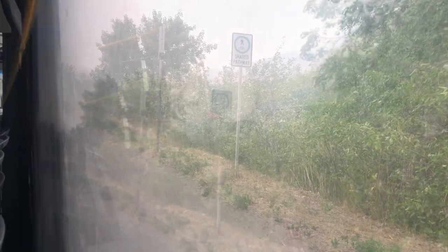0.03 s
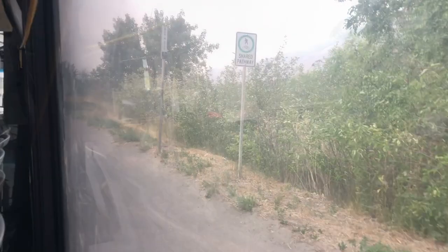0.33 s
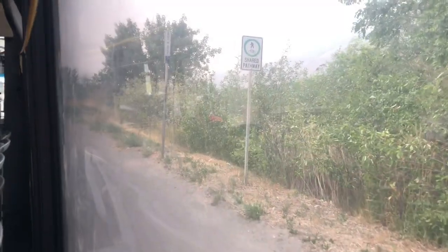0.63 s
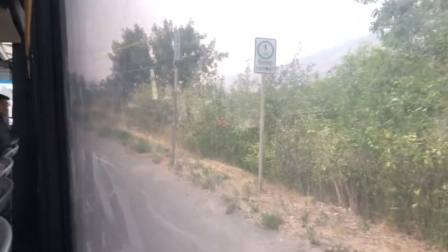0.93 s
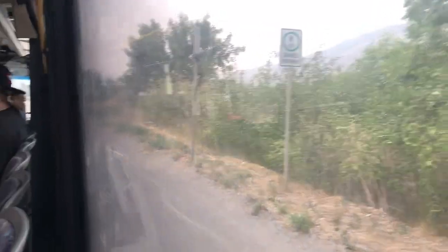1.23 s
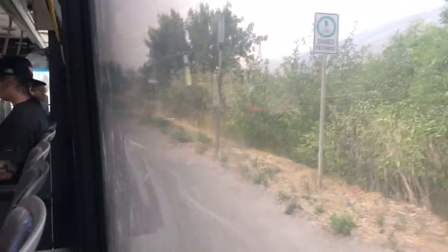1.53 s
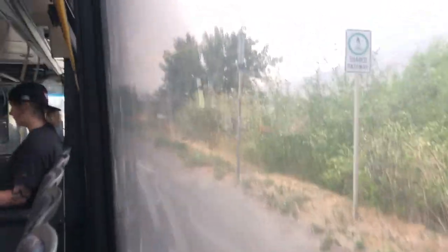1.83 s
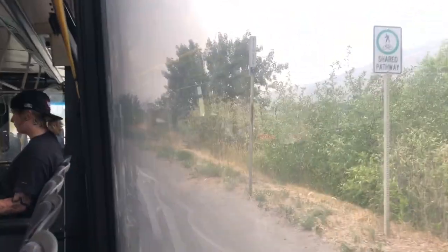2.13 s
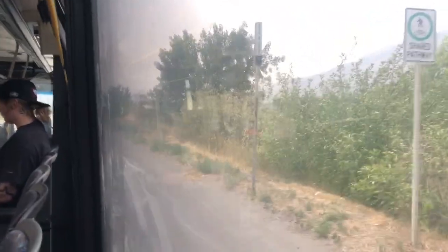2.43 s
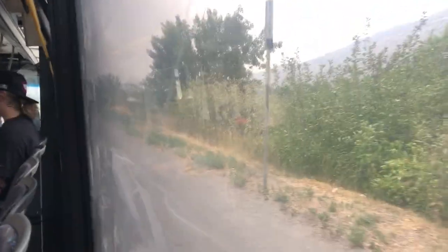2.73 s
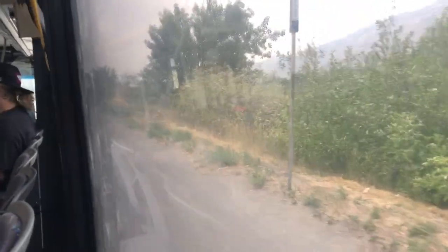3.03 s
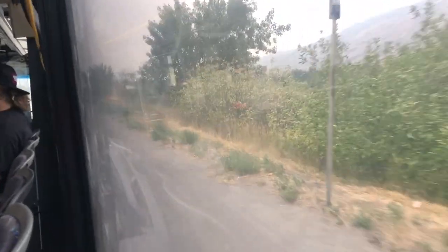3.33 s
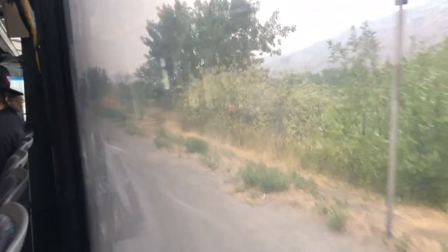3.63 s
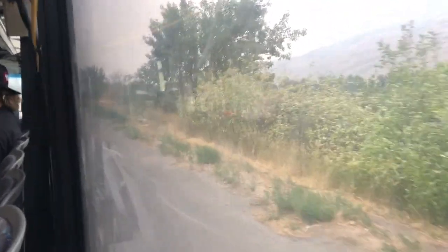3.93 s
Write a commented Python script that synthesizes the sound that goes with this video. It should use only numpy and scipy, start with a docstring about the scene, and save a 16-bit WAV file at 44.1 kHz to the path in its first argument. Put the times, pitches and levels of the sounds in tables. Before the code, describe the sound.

A bus engine revs up with a rising whistle after a loud air hiss, heard inside.

```python
"""Inside a bus pulling away. The brakes vent their air with a loud hiss; a valve puffs once at 0.8 s.
The engine speeds up throughout, its orders booming in turn as they pass the cabin resonances.
A turbocharger whistles upward over rumble and intake hiss; a gear whines faintly near 1.7 s.
Near 2.8 s high orders howl and the body takes the first of four jolts.
At 3.5 s a loose fitting rattles and a second, lower whistle enters at high boost."""
import sys
import numpy as np
from scipy import signal
from scipy.fft import rfft, irfft, next_fast_len
from scipy.io import wavfile
from scipy.ndimage import map_coordinates

SR = 44100
rng = np.random.default_rng(int(sys.argv[2]) if len(sys.argv) > 2 else 0)


def persist_wave(psi):
    """Save psi, clipped to +-1, as 16-bit WAV."""
    counts = np.round(np.clip(psi, -1, 1) * 32767).astype(np.int16)
    wavfile.write(sys.argv[1], SR, np.atleast_2d(counts).T)


N = 176400

# crankshaft (time [s], speed [rev/s])
CRANK_SPEED = [(0, 21.5), (.25, 23.07), (.5, 24.42), (1, 26.42), (1.5, 28.2), (1.75, 29.05), (2.25, 31.38),
               (2.5, 32.73), (3.25, 37.4), (3.75, 40.03), (4, 42.4)]
# engine tones between booms (order [x crank speed], level [dB])
BASE_ORDERS = [(2, -36), (3, -37), (4, -36.5), (5, -39.5), (6, -37), (7, -39), (8, -36.5), (10, -46),
               (16, -45.5)]
# cabin resonances (order [x crank speed], resonance [Hz], width [Hz], level [dB])
CABIN_BOOMS = [(2, 68.5, 4.5, -27), (2, 82, 9.5, -18), (3, 101.5, 16, -24), (3, 113.5, 7.5, -17),
               (4, 96.5, 15, -25.5), (4, 125.5, 9, -23), (4, 138, 6.5, -26.5), (4, 148, 12, -25),
               (14 / 3, 164, 6.8, -22), (14 / 3, 170, 14, -30), (5, 152, 7, -28), (20 / 3, 198, 21, -27),
               (6, 153, 4, -31), (6, 204.5, 24, -25.5), (6, 238.5, 21, -26.5), (5, 208, 24, -29.5),
               (8, 183, 7, -22), (8, 194.5, 11.5, -20.5), (8, 207, 12, -18), (8, 228, 10, -27.5),
               (8, 254, 11, -27.5), (8, 319, 40, -37.5), (10, 380, 27, -29.5), (11, 332.5, 18, -31),
               (11, 370.5, 26, -33), (13, 380, 25, -36), (15, 375.5, 26, -33), (16, 396, 20, -36),
               (16, 439.5, 36, -44.5), (12, 392, 22, -37), (67 / 4, 693, 53, -28.5), (19, 800, 72, -36)]
# howl lines (order [x crank speed], relative level [dB])
HOWL_ORDERS = [(24, -5), (27, -9), (30, -0.5), (32, -3), (35, -2.5), (38, -4), (41, -6), (44, -12)]
# layer envelopes (time [s], level [dB])
RUMBLE_LEVEL = [(0, -28), (.8, -26), (1.25, -25.5), (1.7, -25), (2.2, -22), (2.8, -19), (3.1, -21),
                (3.5, -19), (4, -17)]
DRONE_LEVEL = [(0, -39.5), (.5, -34), (1.2, -32.5), (2.2, -33), (2.7, -30), (3.1, -31), (3.6, -30),
               (4, -32)]
ROAR_LEVEL = [(0, -43.5), (.5, -40), (1.2, -39), (2, -36), (2.5, -35), (2.85, -32.5), (3.2, -35.5),
              (3.6, -37), (4, -36.5)]
HASH_LEVEL = [(0, -47), (.5, -44.5), (2, -45.5), (2.8, -43.5), (3.2, -44.5), (4, -41.5)]
INTAKE_LEVEL = [(0, -52), (.6, -49.5), (1.5, -47.5), (2.1, -46.5), (2.7, -44), (3.1, -43.5), (3.6, -40.5),
                (4, -38)]
GEAR_LEVEL = [(1.4, -75), (1.65, -51), (1.9, -53), (2.2, -68)]
BRAKE_LEVEL = [(0, -20), (.03, -21), (.15, -23.5), (.25, -28.5), (.33, -30.5), (.44, -41.5), (.48, -52),
               (.53, -80), (.6, -120)]
# noise spectra (frequency [Hz], relative density [dB])
RUMBLE_SPECTRUM = [(20, -36), (30, -24), (42, -14.5), (65, -7.5), (110, -1), (160, -0.5), (240, -5.5),
                   (310, -12), (380, -9.5), (480, -25.5), (800, -55)]
DRONE_SPECTRUM = [(200, -33), (350, -3), (450, -0.5), (530, -3), (630, -2.5), (715, 2), (830, -4.5),
                  (1000, -12.5), (1500, -31)]
ROAR_SPECTRUM = [(500, -26), (800, -4), (1000, 0), (1350, -2.5), (1650, -7.5), (2000, -15), (2800, -21),
                 (5000, -28)]
HASH_SPECTRUM = [(1200, -8.5), (1750, -1.5), (2200, 0), (2700, -4), (4200, -5), (5200, -6), (7500, -10.5),
                 (9000, -15), (11000, -17.5), (13000, -21), (16000, -25)]
INTAKE_SPECTRUM = [(4500, -32), (5250, -11.5), (5750, 3), (6450, 0), (7000, -6.5), (7600, -9.5),
                   (9000, -16.5), (11000, -21), (13000, -27), (16000, -26)]
FITTING_SPECTRUM = [(2500, -22), (4700, 8), (6000, -2), (9000, 0), (12000, -7), (16000, -7)]
PUFF_SPECTRUM = [(700, -22), (1250, 2), (1650, -2), (2100, -2), (2700, -1), (3500, 5), (4450, 0),
                 (5100, -7), (6100, 4), (6800, -8), (7500, -3), (8600, -8), (11500, -4.5), (14000, -9),
                 (16000, -5)]
BRAKE_SPECTRUM = [(1000, -28), (2200, -13.5), (3200, -7.5), (4500, -4.5), (5400, 0.5), (7000, 0.5),
                  (8200, 1.5), (10000, -1.5), (12000, -3.5), (14000, -3.5), (16000, -1.5)]
# valve pipe resonances (frequency [Hz], width [Hz], relative level [dB])
PIPE_MODES = [(1230, 43, -10), (3000, 40, -3), (4352, 66, 0), (6245, 63, 2), (6380, 30, 0),
              (9200, 130, -10.5), (13600, 80, -16), (15120, 70, -13)]
# turbocharger whistles (time [s], pitch [Hz], level [dB])
TURBO_TRACK = [(0, 4000, -78), (.5, 5130, -60), (.75, 5750, -49), (1, 6400, -44.5), (1.2, 6880, -45.5),
               (1.45, 7580, -56), (2, 9000, -67), (2.5, 10480, -65), (2.95, 12020, -60), (3.5, 14100, -70),
               (4, 16100, -69)]
BOOST_TRACK = [(3.45, 8900, -80), (3.52, 9000, -58), (3.75, 9620, -51), (3.85, 9830, -61), (4, 10380, -55)]
# fitting ticks and body jolts (time [s], level [dB])
TICKS = [(3.469, -35.5), (3.482, -42)]
JOLTS = [(2.786, -14), (3.468, -14), (3.548, -16), (3.775, -14)]


def amp(db):
    """Decibels to gain."""
    return 10 ** (np.asarray(db) / 20)


def unit(x):
    """Scale to rms 1."""
    return x / np.sqrt(np.mean(x ** 2) + 1e-20)


def time_s():
    """Time of each sample."""
    return np.arange(N) / SR


def curve(rows, column=1):
    """One column of a time table, per sample."""
    columns = np.transpose(rows)
    return np.interp(time_s(), columns[0], columns[column])


def wobble(rate_hz):
    """Smooth random curve."""
    return map_coordinates(rng.standard_normal(8192), [time_s() * rate_hz], mode="wrap")


def filtered(x, response):
    """Apply a frequency response."""
    size = next_fast_len(N + SR // 2)
    return irfft(rfft(x, size) * response(np.fft.rfftfreq(size, 1 / SR)), size)[:N]


def noise(spectrum):
    """Shaped noise, rms 1, silent above the last point."""
    points_hz, db = np.transpose(spectrum)
    response = lambda hz: amp(np.interp(np.log(hz + 1), np.log(points_hz), db, right=-np.inf))
    return unit(filtered(rng.standard_normal(N), response))


def fuzzy_tone(phase_rad, width_hz):
    """Narrow noise band around a tone, rms 1."""
    return unit(wobble(width_hz) * np.cos(phase_rad) + wobble(width_hz) * np.sin(phase_rad))


def burst(start_s, rise_s, hold_s, fall_db_per_s):
    """Attack, hold, release envelope."""
    age_s = time_s() - start_s
    attack = np.clip(age_s / rise_s, 0, 1) ** 2
    return attack * amp(-fall_db_per_s * np.maximum(age_s - rise_s - hold_s, 0))


def cabin(x, t60_s, wet):
    """Dense cabin reflections comb the spectrum; output rms 1."""
    age_s = np.arange(SR // 2) / SR
    tail = rng.standard_normal(len(age_s)) * amp(-60 * age_s / t60_s)
    return unit(x + wet * signal.fftconvolve(x, tail / np.linalg.norm(tail))[:N])


def engine_noise(turns):
    """Rumble and intake hiss; drone, roar and mechanical hash throb with the firings and the shaft."""
    throb = unit(1 + 0.16 * np.cos(2 * np.pi * 4 * turns))  # 4 firings per turn
    lope = 1 + 0.058 * np.cos(2 * np.pi * turns)
    rumble = amp(curve(RUMBLE_LEVEL)) * noise(RUMBLE_SPECTRUM)
    drone = amp(curve(DRONE_LEVEL)) * noise(DRONE_SPECTRUM)
    roar = amp(curve(ROAR_LEVEL)) * noise(ROAR_SPECTRUM)
    fine_hash = amp(curve(HASH_LEVEL)) * noise(HASH_SPECTRUM)
    intake = amp(curve(INTAKE_LEVEL)) * cabin(noise(INTAKE_SPECTRUM), t60_s=0.046, wet=0.48)
    return rumble + (drone + roar + fine_hash) * throb * lope + intake


def gear_whine(turns, order=236):
    """Faint gear tone locked to the crank."""
    return amp(curve(GEAR_LEVEL) + 3 * wobble(40)) * np.sin(2 * np.pi * order * turns)


def turbo_whistle(track, width_hz):
    """Breathy tone, rising as the turbocharger spools up."""
    phase_rad = 2 * np.pi * np.cumsum(curve(track)) / SR
    return amp(curve(track, column=2) + 1.7 * wobble(16)) * fuzzy_tone(phase_rad, width_hz)


def fitting_rattle(t60_s=0.05):
    """A loose fitting gives two light, bright ticks."""
    t = time_s()
    envelope = sum((t >= at_s) * amp(db - 60 * np.abs(t - at_s) / t60_s) for at_s, db in TICKS)
    return noise(FITTING_SPECTRUM) * envelope


def body_jolts(boom_hz=113, rise_s=0.01):
    """Road bumps set off short, low cabin booms."""
    out = np.zeros(N)
    for at_s, db in JOLTS:
        age_s = np.maximum(time_s() - at_s, 0)
        envelope = age_s / rise_s * np.exp(1 - age_s / rise_s)
        out += amp(db) * envelope * np.sin(2 * np.pi * boom_hz * age_s)
    return out


def engine_howl(turns, peak_s=2.78, half_length_s=0.23):
    """Rough high orders swell and fade once."""
    swell = amp(-34.5) / (1 + ((time_s() - peak_s) / half_length_s) ** 2)
    lines = sum(amp(db) * fuzzy_tone(2 * np.pi * order * turns, width_hz=45) for order, db in HOWL_ORDERS)
    return swell * lines


def engine_tones(crank_hz, turns, waver_db=0.94, waver_rad=0.15):
    """Orders swell as they sweep through cabin resonances."""
    order_rms = {order: amp(db) for order, db in BASE_ORDERS}
    for order, resonance_hz, width_hz, db in CABIN_BOOMS:
        detuning = (order * crank_hz - resonance_hz) / width_hz
        order_rms[order] = order_rms.get(order, 0) + amp(db) / (1 + detuning ** 2) ** 4
    out = np.zeros(N)
    for order, rms in order_rms.items():
        phase_rad = 2 * np.pi * (order * turns + rng.random())
        peak = np.sqrt(2) * rms * amp(waver_db * wobble(14))
        out += peak * np.sin(phase_rad + waver_rad * wobble(18))
    return out


def pipe_response(hz):
    """Sum of the valve pipe's resonances."""
    return sum(amp(db) * 1j * hz * width_hz / (mode_hz ** 2 - hz ** 2 + 1j * hz * width_hz)
               for mode_hz, width_hz, db in PIPE_MODES)


def valve_puff():
    """A short blast of air rings its pipe."""
    ring = unit(filtered(rng.standard_normal(N), pipe_response))
    ring *= burst(start_s=0.8135, rise_s=0.003, hold_s=0.015, fall_db_per_s=185)
    jet = cabin(noise(PUFF_SPECTRUM), t60_s=0.044, wet=1.3)
    jet *= burst(start_s=0.803, rise_s=0.027, hold_s=0.017, fall_db_per_s=280)
    return amp(-24.5) * jet + amp(-26) * ring


def brake_air():
    """Air jet, fading as the pressure drops."""
    level_db = curve(BRAKE_LEVEL) + 0.4 * wobble(46)
    return amp(level_db) * cabin(noise(BRAKE_SPECTRUM), t60_s=0.19, wet=1.2)


def scene():
    """Mono mix at a window seat."""
    crank_hz = curve(CRANK_SPEED)
    turns = np.cumsum(crank_hz) / SR
    engine = engine_tones(crank_hz, turns) + engine_noise(turns) + engine_howl(turns) + gear_whine(turns)
    turbo = turbo_whistle(TURBO_TRACK, width_hz=230) + turbo_whistle(BOOST_TRACK, width_hz=110)
    return (engine + turbo + brake_air() + valve_puff() + fitting_rattle() + body_jolts())[None]


def record(dry):
    """Brick-wall low-pass."""
    return filtered(dry[0], lambda hz: hz < 15750)[None]


dry = scene()
out = record(dry)
persist_wave(out)
```